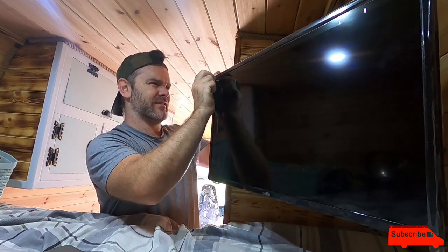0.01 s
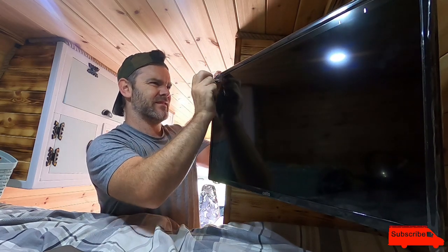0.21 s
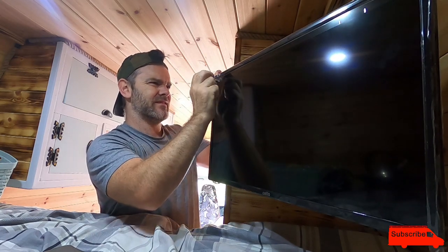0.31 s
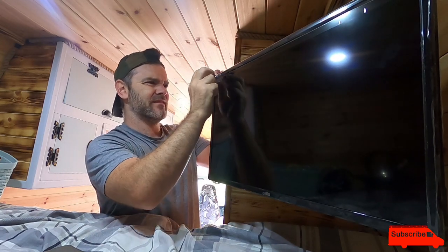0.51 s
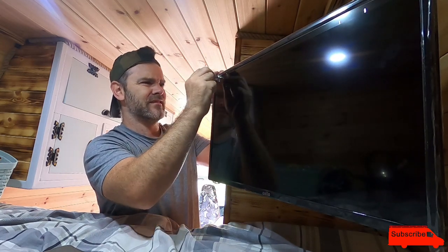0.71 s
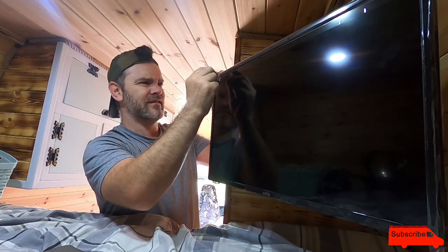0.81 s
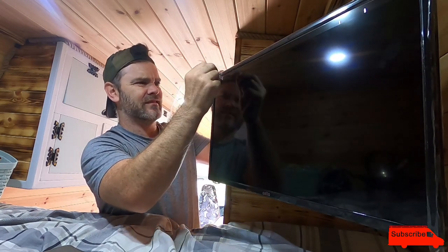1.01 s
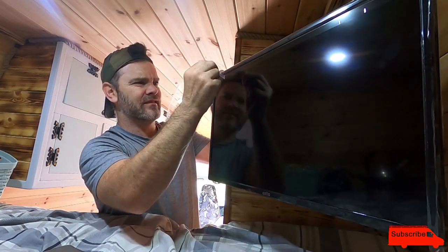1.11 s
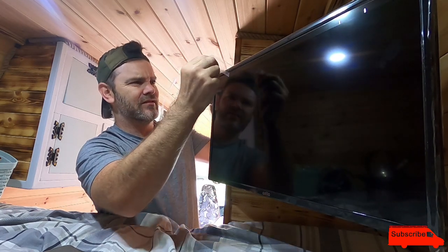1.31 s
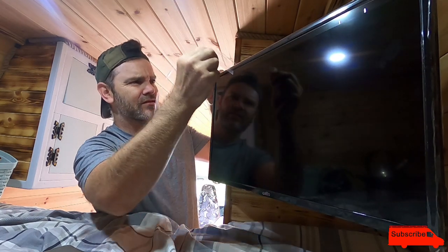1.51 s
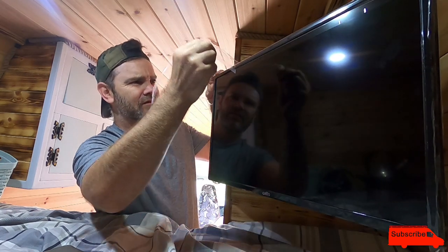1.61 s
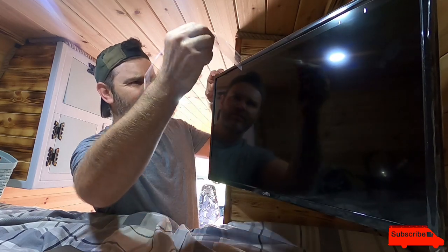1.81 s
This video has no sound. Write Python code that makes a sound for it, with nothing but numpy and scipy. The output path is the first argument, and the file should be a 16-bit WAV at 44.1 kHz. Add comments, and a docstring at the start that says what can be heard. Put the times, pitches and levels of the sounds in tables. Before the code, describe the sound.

Close stereo pickup of protective film pulled from a big flat panel indoors; a short scrape leads to a sharp tear, isolated dry snaps follow, then continuous crackly rustling builds over faint room rumble.

```python
"""Low room rumble first, then faint snaps and a fingernail's scrape swelling at the corner of a thin plastic film
on a large screen in a wood-lined room. Slip-gated noise rips the film loose; low panel modes jolt. Rung noise
bursts make single snaps; dense noise grains through sheet resonances make a crackling peel, over a noise-band
panel hum. A faint gliding sine whistles, perhaps a bird outside."""
import sys
import numpy as np
from scipy import signal
from scipy.fft import rfft, irfft, next_fast_len
from scipy.io import wavfile

SR = 44100
rng = np.random.default_rng(int(sys.argv[2]) if len(sys.argv) > 2 else 0)


def persist_wave(psi):
    """Save psi, clipped to +-1, as 16-bit WAV."""
    counts = np.round(np.clip(psi, -1, 1) * 32767).astype(np.int16)
    wavfile.write(sys.argv[1], SR, np.atleast_2d(counts).T)


N = 83790

# Still air of the room: (frequency [Hz], density [dB per Hz, relative])
AIR_SPECTRUM = [(130, 2), (800, -4.5), (3000, -12), (9000, -22)]
AIR_DB = -77
# Room rumble: (frequency [Hz], density [dB per Hz, relative])
RUMBLE_SPECTRUM = [(15, 5), (27, 2.5), (34, 9), (61, -18.5), (76, -39), (130, -57), (170, -45), (290, -120)]
# Room rumble: (time [s], level [dB])
RUMBLE_LEVEL = [(0.0, -45.5), (0.168, -62), (0.226, -53), (0.364, -65), (0.634, -59), (0.752, -50),
                (0.92, -53), (1.02, -66.5), (1.27, -64), (1.375, -55.5), (1.602, -61.5), (1.9, -56.5)]

# Whistle gliding down: (time [s], pitch [Hz], level [dB])
WHISTLE_GLIDE = [(0.575, 2180, -87), (0.585, 2172, -69), (0.638, 2190, -65), (0.652, 2095, -68.5),
                 (0.696, 1894, -62.5), (0.716, 1907, -62), (0.73, 1936, -67)]
# Rougher, rising tail of the whistle: (time [s], pitch [Hz], level [dB])
WHISTLE_TAIL = [(.72, 2150, -72), (.73, 2487, -72), (.745, 2660, -72), (.76, 2710, -81)]
WHISTLE_T60_S, WHISTLE_WALL_CUT_HZ, WHISTLE_ROOM_DB = 0.5, 7700, -15.5

# Panel shakes: (start [s], frequency [Hz], level [dB], t60 [s])
PANEL_JOLTS = [(0.223, 281.2, -34, 0.21), (.232, 171, -26.5, 0.12), (0.262, 52, -29.5, 0.29)]
JOLT_RISE_S = 0.012
# Panel hum: (time [s], centre pitch [Hz], level [dB])
PANEL_HUM = [(0.0, 155.7, -64), (0.184, 226.2, -56.5), (0.254, 191.3, -39), (0.332, 153.8, -55),
             (0.432, 195, -54), (0.502, 197.3, -73.5), (0.56, 187.9, -59), (0.644, 160.8, -74),
             (0.956, 182.1, -70), (1.026, 195.5, -58.5), (1.094, 198.2, -70.5), (1.418, 205.8, -52.5),
             (1.576, 214, -59), (1.782, 235.2, -55), (1.9, 218.5, -63.5)]
HUM_POLE_HZ = 60

# Nail dragging at the corner: (time [s], level [dB])
DRAG_LEVEL = [(0.062, -71.5), (0.112, -56.5), (0.118, -50), (0.143, -41.5), (0.203, -44), (0.21, -39)]
# Scrape of the nail: (frequency [Hz], density [dB per Hz, relative])
DRAG_SPECTRUM = [(240, -47), (400, -12.5), (445, -22), (746, -5), (1190, -12), (1280, 3), (1810, -10.5),
                 (2590, 3.5), (3080, -27), (3910, -20), (6050, -25.5), (7390, -14.5), (9500, -59)]

# Rip: (time [s], treble level [dB], mids level [dB])
RIP_LEVELS = [(0.2101, -25, -36), (0.221, -28.5, -29.5), (0.24, -23, -40.5), (0.248, -28, -36.5),
              (0.257, -30.5, -30.5), (0.263, -39, -39.5), (0.274, -51, -47)]
# Rip: (frequency [Hz], density [dB per Hz, relative])
RIP_SPECTRUM = [(240, -64), (400, -20), (562, -11.5), (839, -23), (1060, -0.5), (1230, -17), (2750, -10.5),
                (3810, -2.5), (5780, 2), (7060, 6.5), (16000, -22.5)]
SLIPS_PER_S, SLIP_DEPTH, SLIP_DECAY_S, SLIP_SCATTER_DB = 290, 0.85, 0.0016, 0.5  # rate is a centre value

# Snaps: (time [s], dry peak [dB], own pitch [Hz], weights of mids, upper mids, treble [dB])
SNAPS = [(0.018, -45.5, 7260, -11, -59, -6), (0.105, -45, 6900, -20, -13, 9),
         (0.161, -46, 2630, 5, -13, -25), (0.179, -40, 3820, -6, 8, 10), (0.2101, -9, 7060, -26, -12, 9),
         (0.2443, -10, 4000, -32, -17, -16), (0.2728, -27, 1690, 7, 5, -19),
         (0.2986, -20.5, 1920, -3, 0, -48), (0.325, -41.5, 1800, -16, -9, -21),
         (0.3718, -34, 2540, 4, 3, -43), (0.3877, -15.5, 5030, -42, 10, -28),
         (0.4200, -32, 1710, 3, 3, -30), (0.5059, -39, 2970, 12, -4, -41),
         (0.5510, -18, 3620, -10.5, -7.5, -17.5), (0.7565, -39, 5320, -18, -11.5, -13),
         (0.7923, -32.5, 4920, -6.5, -11, -39), (0.859, -14.5, 5040, -13, -6, -15),
         (0.878, -30.5, 3500, 2, -5, -57), (0.9133, -43, 4820, -27, -13, -8),
         (1.0259, -27.5, 1330, -1, 2, -51), (1.0550, -34, 1030, -1.5, -9, -35),
         (1.113, -36, 7000, -15, -24, -5), (1.17, -31, 8000, -29, -31, 0), (1.178, -27, 7700, -30, -25, 0),
         (1.193, -38, 4960, -15, -5, -5), (1.197, -32, 3500, -7, -5, -13), (1.242, -29, 3600, -30, -8, -29),
         (1.248, -29.5, 7300, -25, -22, 0), (1.2762, -30, 6600, -10, 1, -11),
         (1.5092, -25.5, 1080, -17, 1, -13), (1.5569, -32.5, 2955, 6, -17, -10),
         (1.586, -30, 4880, 11, -43, 0)]
# Frequencies at which the three snap weights apply: [Hz]
SNAP_WEIGHT_HZ = [1500, 4000, 8000]
# Short modes of the sheet: (frequency [Hz], relative level [dB], t60 [s])
SNAP_MODES = [(1026, -7.5, 0.042), (1550, -18.5, 0.041), (1800, 0, 0.022), (2525, -2, 0.017),
              (3500, 1, 0.0044), (3870, 1.5, 0.0093), (5280, 15, 0.0023), (6970, 15.5, 0.0058),
              (8100, -6, 0.0074), (11300, -18, 0.0023)]
SNAP_LOW_CUT_HZ, SNAP_HIGH_CUT_HZ, MODE_SCATTER_DB = 880, 9700, -0.5  # scatter is symmetric
SNAP_RISE_S, BURST_DECAY_S, TAIL_DECAY_S, TAIL_DB = 0.00025, 0.0008, 0.0066, -19.5
CLICK_DB = 9  # sharp front of a snap, over its noise
PITCH_DB, PITCH_T60_CYCLES = -3, 32

# Peel rustle: (time [s], levels below 3 kHz, 3-6 kHz, 6-10 kHz, above 10 kHz [dB]), in consecutive lists
PEEL_LEVELS = [
    [(0.0, -103, -110, -74, -108), (0.132, -60.5, -112, -66.5, -80), (0.188, -52, -49, -56.5, -61),
     (0.26, -52, -54, -47, -68), (0.304, -59, -53, -58, -62)],
    [(0.362, -61, -65, -82, -85), (0.374, -50, -54, -66, -85), (0.398, -49, -42, -45, -78),
     (0.405, -77, -79, -72, -86), (0.424, -57, -62, -62, -78), (0.467, -61.5, -64, -75, -86),
     (0.476, -68, -78, -75, -90)],
    [(0.51, -62, -70.5, -81, -98), (0.592, -79, -68, -70, -99), (0.742, -82, -86, -77.5, -100)],
    [(0.752, -56, -77, -72, -95), (0.81, -68, -64, -60.5, -93), (0.848, -63, -61, -66.5, -71),
     (0.934, -62.5, -62, -70.5, -64.5), (1.0, -59, -58, -72, -71)],
    [(1.01, -54.5, -58, -65, -66), (1.064, -51.5, -53.5, -58.5, -63), (1.215, -53.5, -58.5, -55.5, -66),
     (1.243, -54, -50, -46.5, -61), (1.256, -55, -54, -56, -65), (1.293, -49, -48, -54.5, -63),
     (1.298, -48.5, -50.5, -41, -63), (1.342, -48, -44.5, -44, -51.5), (1.443, -47.5, -43, -46.5, -49)],
    [(1.452, -48.5, -47.5, -50.5, -57), (1.522, -52, -50.5, -52.5, -57), (1.548, -60, -55, -60, -62),
     (1.56, -49.5, -48.5, -50.5, -60), (1.652, -50, -44.5, -50, -56), (1.792, -54.5, -46.5, -49.5, -50.5),
     (1.9, -51, -45.5, -42.5, -47)],
]
# Film: (frequency [Hz], density [dB per Hz, relative])
FILM_SPECTRUM = [(300, -25.5), (514, -2), (754, -12.5), (1040, 1), (1500, 2.5), (1950, -1), (2400, 2),
                 (3900, -2), (4350, -6), (4820, -3), (5940, -8.5), (7670, -10), (12200, -23.5),
                 (16000, -29)]
# Resonances of the sheet: (frequency [Hz], width [Hz], relative level [dB])
SHEET_RINGS = [(998, 120, 3.5), (1330, 62.7, 7.5), (2661, 370, 5.5), (3555, 190, 2.5), (4880, 180, -1.5),
               (6900, 400, 0), (8190, 880, 4.5)]
RINGS_DB, RING_WANDER, RING_WANDER_POLE_HZ = -3, 0.02, 2.5  # wander: rms fraction of pitch
GRAINS_PER_S, GRAIN_SPREAD_DB, CLUMP_DB = 6000, 2.0, 0.36
SMOOTH_SHARE = 0.87  # share of the drive power that is smooth hiss
PATCHY_DB = 2
TICKS_PER_S, TICK_DB, TICK_T60_CYCLES = 280, -14, 3.4

ROOM_T60_S, WALL_CUT_HZ, ROOM_DB = 0.098, 1950, -9.5
# Stereo width: (frequency [Hz], left-right likeness [0 to 1])
LIKENESS = [(60, 0.92), (130, 0.8), (290, 0.9), (640, 0.78), (1410, 0.91), (3100, 0.78), (6820, 0.65),
            (15000, 0.44)]
# Left microphone: (frequency [Hz], gain [dB])
LEFT_GAIN = [(100, -1.3), (1000, -0.7), (8000, 0.5), (14000, -5)]
LEFT_LAG_SAMPLES, TOP_STOP_HZ = 1, 16300


def from_db(db):
    """Amplitude ratio of a level in dB."""
    return 10 ** (np.asarray(db) / 20)


def rms_one(x):
    """Scale to rms 1."""
    return x / np.sqrt(np.mean(x ** 2) + 1e-20)


def bins_hz():
    """FFT bin frequencies, kept above zero for the log axis."""
    return np.maximum(np.fft.rfftfreq(N, 1 / SR), 1)


def in_time(rows):
    """Interpolate every column over the samples."""
    time_s, *columns = np.transpose(rows)
    return [np.interp(np.arange(N) / SR, time_s, column) for column in columns]


def fenced(rows, lead_s, trail_s):
    """Curve columns; the last, a level, fades to -99 dB before and after."""
    first, last = rows[0], rows[-1]
    before = (first[0] - lead_s, *first[1:-1], -99)
    after = (last[0] + trail_s, *last[1:-1], -99)
    return in_time([before, *rows, after])


def at_hz(points, hz):
    """Interpolate a (Hz, value) table on a log frequency axis."""
    point_hz, values = np.transpose(points)
    return np.interp(np.log(hz), np.log(point_hz), values)


def white_pair():
    """Two independent channels of white noise."""
    return rng.standard_normal((2, N))


def drift(pole_hz):
    """Slow random curve, rms 1: noise through two equal poles."""
    r = np.exp(-2 * np.pi * pole_hz / SR)
    noise = rng.standard_normal(N + SR)
    return rms_one(signal.lfilter([1], [1, -2 * r, r * r], noise)[SR:])


def ring(x, hz, t60_s):
    """Two-pole resonator: a unit click starts a decaying sine of height 1."""
    r = from_db(-60 / (t60_s * SR))
    w = 2 * np.pi * hz / SR
    return signal.lfilter([0, np.sin(w)], [1, -2 * r * np.cos(w), r * r], x + 1e-18)


def coloured(x, spectrum):
    """Give white noise a spectrum, silent outside it; rms 1."""
    hz = bins_hz()
    inside = (hz > spectrum[0][0]) & (hz < spectrum[-1][0])
    return rms_one(irfft(rfft(x) * from_db(at_hz(spectrum, hz)) * inside, N))


def spread(mid, side):
    """Mix mid and side so that left-right likeness follows its table."""
    alike = np.clip(at_hz(LIKENESS, bins_hz()), 0, 1)
    common = rfft(mid) * np.sqrt((1 + alike) / 2)
    opposed = rfft(side) * np.sqrt((1 - alike) / 2)
    return irfft(common + opposed * [[1], [-1]], N)


def split(x, edges_hz):
    """Bands that add up to the whole."""
    lows = [signal.sosfiltfilt(signal.butter(3, hz, fs=SR, output="sos"), x) for hz in edges_hz]
    return np.diff([0 * x, *lows, x], axis=0)


def room(x, t60_s, wall_cut_hz):
    """Reverberation: eight feedback delays a side, duller on every round."""
    size = next_fast_len(N + SR)
    z = np.exp(-2j * np.pi * np.fft.rfftfreq(size))  # one-sample delay
    dull = np.exp(-2 * np.pi * wall_cut_hz / SR)
    response = np.zeros((2, len(z)), complex)
    lags = (rng.uniform(0.003, 0.018, 16) * SR).astype(int)
    for k, lag in enumerate(lags):
        wall = (1 - dull) / (1 - dull * z)
        loop = from_db(-60 * lag / SR / t60_s) * wall * z ** lag
        response[k % 2] += loop / (1 - loop) * (-1) ** (k // 2)
    return irfft(response * rfft(x, size), size)[:, :N]


def air():
    """Still air of the room: steady noise, falling with frequency."""
    return from_db(AIR_DB) * spread(*coloured(white_pair(), AIR_SPECTRUM))


def rumble():
    """Room rumble: low noise of changing level."""
    level_db, = in_time(RUMBLE_LEVEL)
    return from_db(level_db) * spread(*coloured(white_pair(), RUMBLE_SPECTRUM))


def whistle():
    """A thin sine glides down, then a rougher one rises."""
    out = np.zeros(N)
    for rows, rough_db in (WHISTLE_GLIDE, 2.2), (WHISTLE_TAIL, 4.0):
        hz, level_db = fenced(rows, 0.014, 0.01)
        tone = np.sqrt(2) * np.sin(2 * np.pi * np.cumsum(hz) / SR)
        out += from_db(level_db + rough_db * drift(58.5)) * tone
    return out


def jolt():
    """The big panel shakes in a few decaying low modes, shortly after the rip starts."""
    out = np.zeros(N)
    for start_s, hz, level_db, t60_s in PANEL_JOLTS:
        age_s = np.maximum(np.arange(N) / SR - start_s, 0)
        envelope = (1 - np.exp(-age_s / JOLT_RISE_S)) * from_db(-60 * age_s / t60_s)
        out += from_db(level_db) * envelope * np.sin(2 * np.pi * hz * age_s)
    return out


def hum():
    """Panel hum: slow noise modulates sine and cosine into a narrow band at a wandering pitch."""
    hz, level_db = in_time(PANEL_HUM)
    phase = 2 * np.pi * np.cumsum(hz) / SR
    pair = [drift(HUM_POLE_HZ) * np.sin(phase) + drift(HUM_POLE_HZ) * np.cos(phase) for _ in range(2)]
    return from_db(level_db) * spread(*pair)


def drag():
    """Nail on the corner: a scrape of flickering noise that swells up to the rip."""
    level_db, = fenced(DRAG_LEVEL, 0.0065, 0.004)
    flicker_db = 1.4 * drift(63)
    scrape = spread(*coloured(white_pair(), DRAG_SPECTRUM))
    return from_db(level_db + flicker_db) * scrape


def rip():
    """The corner tears in uneven slips: short bright spurts over steadier tearing in the mids."""
    slip_count = np.cumsum(SLIPS_PER_S * from_db(1.8 * drift(60))) / SR
    strength = from_db(SLIP_SCATTER_DB * rng.standard_normal(N))[slip_count.astype(int)]
    decay = np.exp(-(slip_count % 1) / SLIPS_PER_S / SLIP_DECAY_S)
    gate = 1 - SLIP_DEPTH + SLIP_DEPTH * strength * decay
    mids, treble = split(coloured(white_pair(), RIP_SPECTRUM), [3000])
    before = (RIP_LEVELS[0][0] - 0.001, -99, -99)
    after = (RIP_LEVELS[-1][0] + 0.01, -99, -99)
    treble_db, mids_db = in_time([before, *RIP_LEVELS, after])
    spurts = from_db(treble_db) * rms_one(treble * gate)
    tearing = from_db(mids_db) * rms_one(mids * np.sqrt(gate))
    return spread(*(spurts + tearing))


def snaps():
    """A click and brief noise with a ragged tail ring each snap's own pitch and the sheet's short modes."""
    out = np.zeros(N + SR)
    t = np.arange(int(0.04 * SR)) / SR
    decay = np.exp(-t / BURST_DECAY_S) + from_db(TAIL_DB) * np.exp(-t / TAIL_DECAY_S)
    shape = (1 - np.exp(-(t / SNAP_RISE_S) ** 2)) * decay
    low_cut = signal.butter(8, SNAP_LOW_CUT_HZ, "high", fs=SR, output="sos")
    high_cut = signal.butter(2, SNAP_HIGH_CUT_HZ, fs=SR, output="sos")
    for start_s, peak_db, own_hz, *weights_db in SNAPS:
        weights = list(zip(SNAP_WEIGHT_HZ, weights_db))
        scatter_db = MODE_SCATTER_DB * rng.standard_normal(20)  # one per mode, rest spare
        burst = rng.standard_normal(len(t)) * shape
        burst[0] += from_db(CLICK_DB)
        sheet = np.zeros(len(t))
        for (hz, mode_db, t60_s), change_db in zip(SNAP_MODES, scatter_db):
            level_db = mode_db + change_db + at_hz(weights, hz)
            sheet += from_db(level_db) * rms_one(ring(burst, hz, t60_s))
        own_pitch = rms_one(ring(burst, own_hz, PITCH_T60_CYCLES / own_hz))
        sound = rms_one(sheet) + from_db(PITCH_DB) * own_pitch
        sound = signal.sosfilt(np.vstack([low_cut, high_cut]), sound)
        out[int(start_s * SR):][:len(t)] += from_db(peak_db) * sound / np.abs(sound).max()
    return out[:N]


def wandering(x, hz):
    """Slide a narrow band in pitch as the free part of the sheet changes shape."""
    offset_hz = RING_WANDER * hz * drift(RING_WANDER_POLE_HZ)
    phase = 2 * np.pi * np.cumsum(offset_hz) / SR
    return np.real(signal.hilbert(x) * np.exp(1j * phase))


def peel():
    """Glue lets go in grains, pitched ticks and smooth hiss that ring the sheet in shifting patches."""
    clump = rms_one(from_db(CLUMP_DB * (drift(10.5) + drift(64))))
    heights = from_db(GRAIN_SPREAD_DB * np.minimum(rng.exponential(1, (2, N)), 4))
    heights = heights * rng.choice([-1, 1], (2, N))
    luck = rng.random((2, N))
    pitch_index = rng.integers(0, 14, N)
    grains = rms_one(heights * (luck < GRAINS_PER_S / SR))
    drive = np.sqrt(SMOOTH_SHARE) * white_pair() + np.sqrt(1 - SMOOTH_SHARE) * grains

    tick_clicks = heights * (luck[0] < TICKS_PER_S * clump / SR)
    ticks = np.zeros((2, N))
    for k, hz in enumerate(np.geomspace(1000, 11000, 14)):
        ticks += np.sqrt(hz) * ring(tick_clicks * (pitch_index == k), hz, TICK_T60_CYCLES / hz)
    drive = coloured(drive + from_db(TICK_DB) * rms_one(ticks), FILM_SPECTRUM)

    rung = np.zeros((2, N))
    for hz, width_hz, level_db in SHEET_RINGS:
        gain = from_db(level_db + 4.0 * drift(5))
        band = rms_one(ring(drive, hz, 2.2 / width_hz))  # 2.2 / width = t60
        rung += gain * wandering(band, hz)
    sheet = spread(*(clump * (drive + from_db(RINGS_DB) * rms_one(rung))))

    patches = split(sheet, [900, 1500, 2200, 3000, 4200, 6000, 8000, 11000])
    sheet = sum(from_db(PATCHY_DB * drift(15)) * band for band in patches)
    levels_db = in_time(np.concatenate(PEEL_LEVELS))
    parts = split(sheet, [3000, 6000, 10000])
    return sum(from_db(db) * rms_one(part) for db, part in zip(levels_db, parts))


def scene():
    """Sum the layers; snaps and whistle also get reverberation."""
    near, far = snaps(), whistle()
    far = far + from_db(WHISTLE_ROOM_DB) * room(far, WHISTLE_T60_S, WHISTLE_WALL_CUT_HZ)
    background = rumble() + air() + far
    near = near + from_db(ROOM_DB) * room(near, ROOM_T60_S, WALL_CUT_HZ)
    return background + near + jolt() + drag() + peel() + hum() + rip()


def record(dry):
    """The left microphone is a little duller and later; the top is cut on both."""
    hz = bins_hz()
    lag = np.exp(-2j * np.pi * hz * LEFT_LAG_SAMPLES / SR)
    left = irfft(rfft(dry[0]) * from_db(at_hz(LEFT_GAIN, hz)) * lag, N)
    top_cut = signal.cheby2(14, 80, TOP_STOP_HZ, fs=SR, output="sos")
    return signal.sosfilt(top_cut, [left, dry[1]])


dry = scene()
out = record(dry)
persist_wave(out)
```